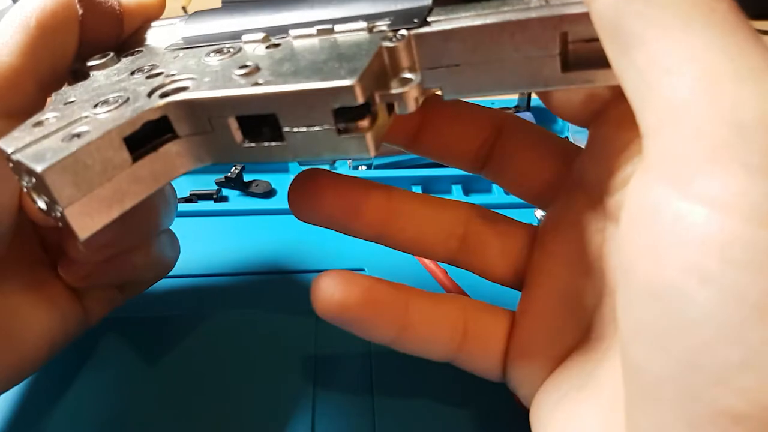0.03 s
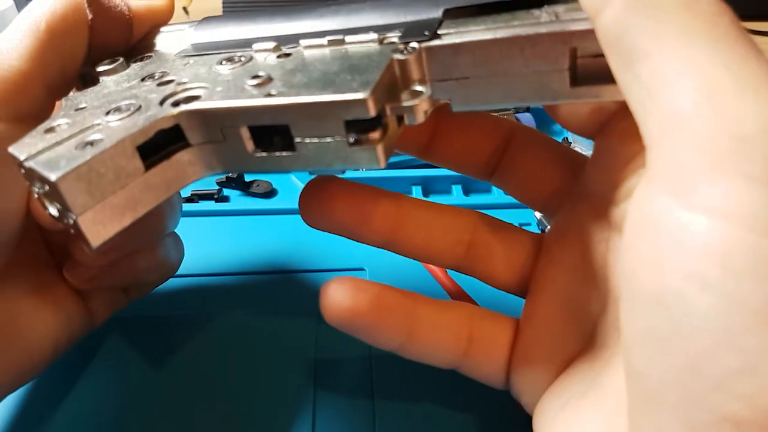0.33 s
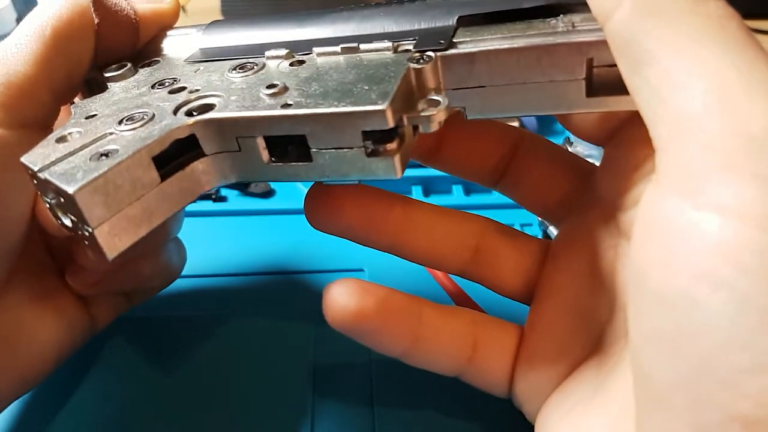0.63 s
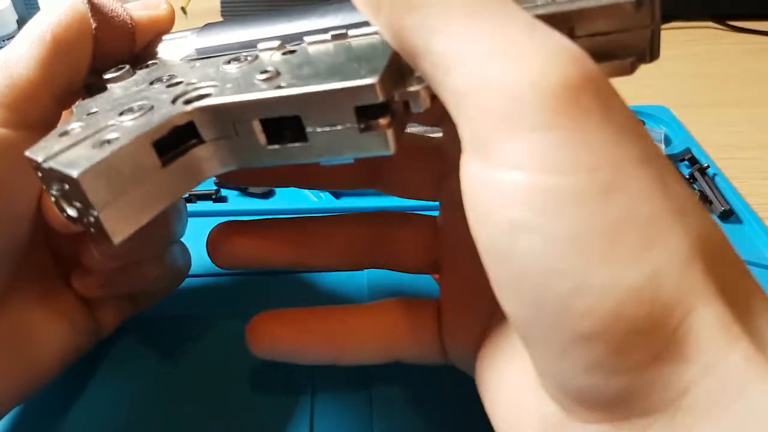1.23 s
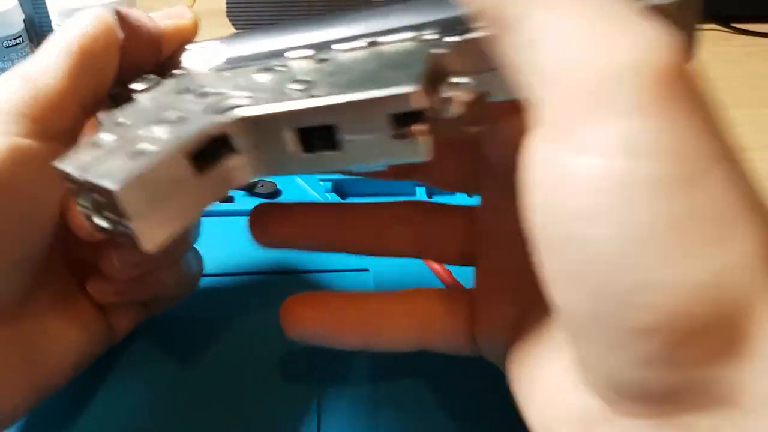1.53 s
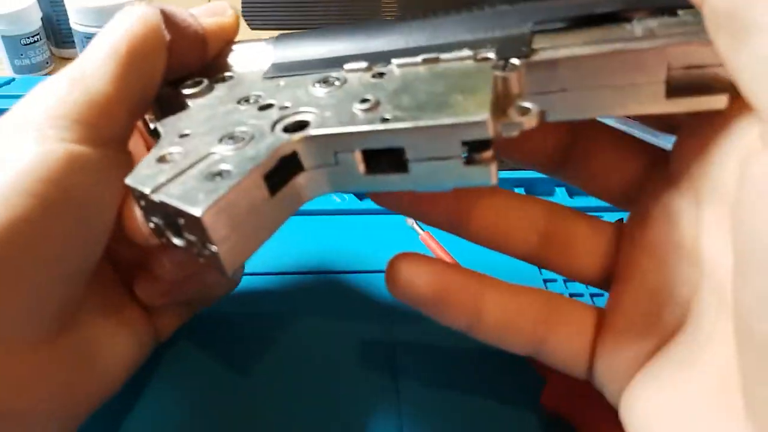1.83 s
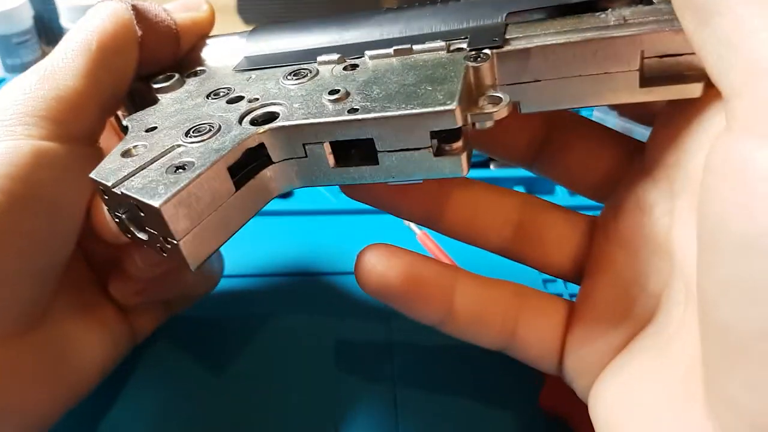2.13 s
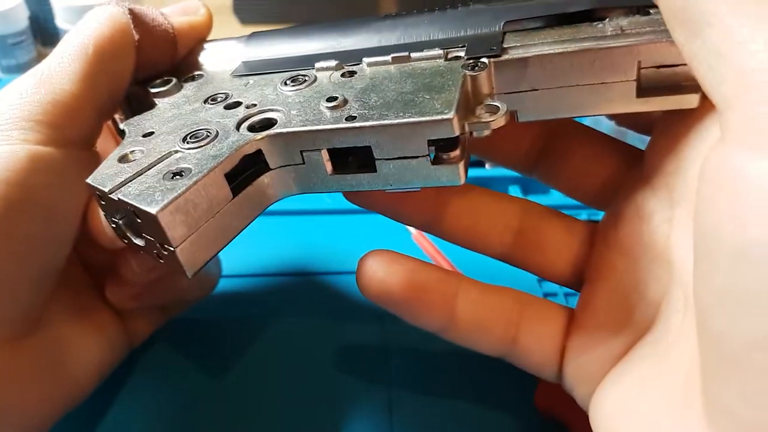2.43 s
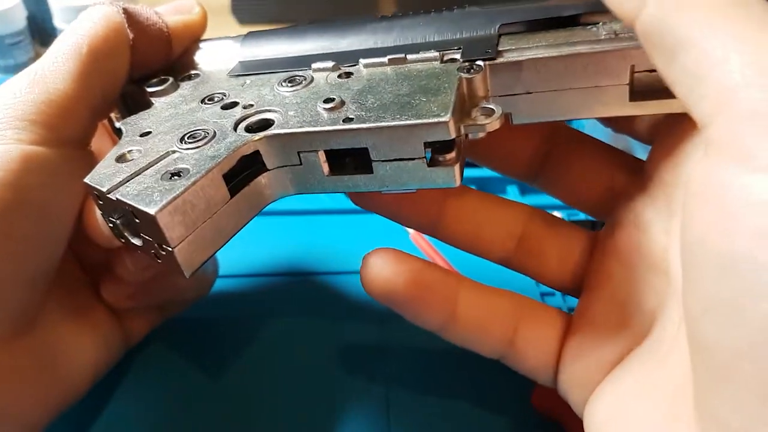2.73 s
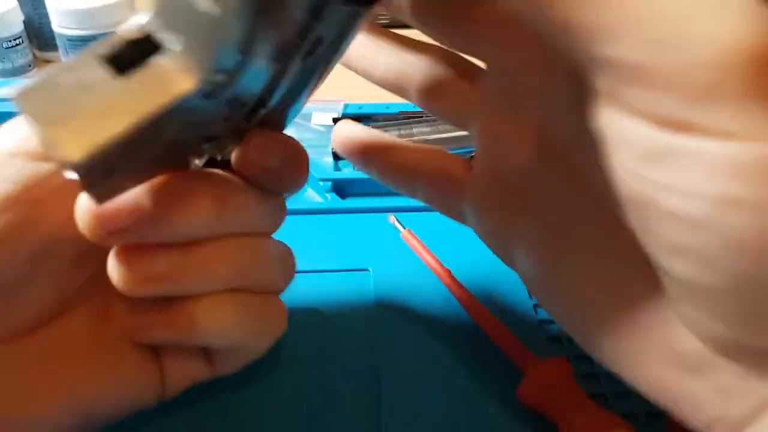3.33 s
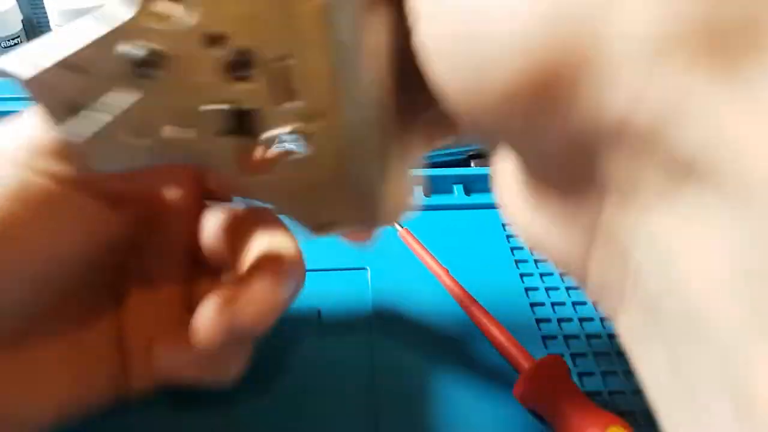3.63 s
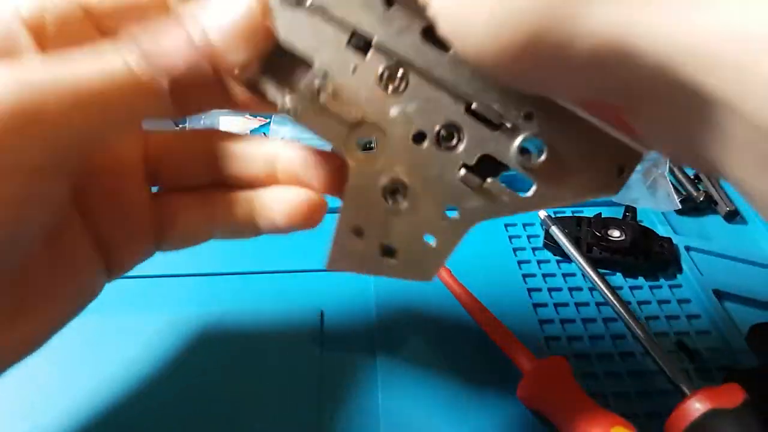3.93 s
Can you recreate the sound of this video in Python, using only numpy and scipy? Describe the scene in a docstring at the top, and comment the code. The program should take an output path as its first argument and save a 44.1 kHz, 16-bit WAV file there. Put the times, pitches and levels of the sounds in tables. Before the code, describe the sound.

A small metal gearbox is spun twice by hand, its gears whirring and clicking fast before coasting down each time. A brief metal scrape and dry clacks follow, heard up close over a faint room hum.

```python
"""A small gearbox spun by hand

A cast-metal gearbox is spun twice and coasts down each time. Gear teeth rattle in the ringing case,
a pawl (a sprung catch) snaps over its ratchet, and slack in the gears closes with knocks.
Then the box is turned over with a slide and a few dry clacks. The room hums quietly."""
import sys
import numpy as np
from scipy import signal
from scipy.fft import rfft, irfft
from scipy.io import wavfile

SR = 44100
rng = np.random.default_rng(int(sys.argv[2]) if len(sys.argv) > 2 else 0)


def to_wav(s):
    """Save 16-bit WAV."""
    ch = np.atleast_2d(s).T  # columns
    pcm = np.round(np.clip(ch, -1, 1) * 32767)  # PCM
    wavfile.write(sys.argv[1], SR, pcm.astype(np.int16))


N = 176400
T = np.arange(N) / SR
RING_SAMPLES = 4096
DAMPED_T60_S = 0.01017  # a "t60" is the time a sound takes to fade by 60 dB


def from_db(db):
    """Turn decibels into a number to multiply by."""
    return 10 ** (np.asarray(db) / 20)


def unit_energy(x):
    """Scale a sound so that its channels have an average energy of one."""
    return x / np.sqrt(np.mean(np.sum(x ** 2, axis=-1)) + 1e-20)


def over_time(points, seconds):
    """Read a table of times and values, drawing straight lines between its rows."""
    return np.interp(seconds, *np.transpose(points))


def over_frequency(points, size):
    """Read a table of frequencies and values at each frequency of a spectrum."""
    hz, value = np.transpose(points)
    spectrum_hz = np.arange(size // 2 + 1) * SR / size
    return np.interp(np.log(spectrum_hz + 1), np.log(hz), value)


def coloured(x, colour):
    """Make some frequencies louder and others softer, following a table."""
    size = x.shape[-1]
    cepstrum = irfft(np.log(from_db(over_frequency(colour, size))), size)
    # Folding onto the first half makes the filter ring after a hit, not before it.
    cepstrum[1:size // 2] *= 2
    cepstrum[size // 2:] = 0
    return irfft(rfft(x) * np.exp(rfft(cepstrum)), size)


def resonance(x, hz, width_hz):
    """Keep a narrow band of the sound around one pitch."""
    r = np.exp(-np.pi * width_hz / SR)
    feedback = [1, -2 * r * np.cos(2 * np.pi * hz / SR), r * r]
    return signal.lfilter(np.array([1, 0, -1]) * (1 - r * r) / 2, feedback, x)


def dulled(x, cutoff_hz, order=1):
    """Turn down the treble above the cutoff."""
    return signal.lfilter(*signal.butter(order, cutoff_hz, fs=SR), x)


def dying_noise(t60, size=RING_SAMPLES):
    """A burst of stereo noise that fades away."""
    return unit_energy(rng.standard_normal((2, size)) * from_db(-60 * T[:size] / t60))


def add(out, start_s, sound):
    """Mix a sound in at the given time."""
    i = int(np.clip(start_s * SR, 0, N - 1))
    out[..., i:i + sound.shape[-1]] += sound[..., :N - i]


def room_noise():
    """A soft, steady rush whose low notes are nearly the same in both ears."""
    # Each row: frequency in Hz, relative level in dB.
    noise_colour = [(20, 2), (45, -11), (72, -1.5), (98, -8.5), (130, -3.5), (190, -4), (300, -7.5),
                    (450, -11.5), (700, -17.5), (1200, -22.5), (2000, -21.5), (4000, -30), (8000, -37),
                    (16000, -32)]
    # Each row: frequency in Hz, how alike left and right are from 0 to 1.
    ear_likeness = [(50, .99), (130, 0.93), (300, 0.84), (800, 0.31), (2000, 0)]
    common, side = rfft(rng.standard_normal((2, N)))
    alike = over_frequency(ear_likeness, N)
    spectrum = np.sqrt(1 + alike) * common + np.sqrt(1 - alike) * side * [[1], [-1]]
    air = irfft(from_db(over_frequency(noise_colour, N)) * spectrum, N)
    return from_db(-50) * np.sqrt(N) * unit_energy(air)


def room_hum():
    """Three low, steady tones hum in the room."""
    # Each row: pitch in Hz, average level in dB.
    hum_tones = [(74.5, -61), (123, -63), (190, -62)]
    return sum(np.sqrt(2) * from_db(db) * np.sin(2 * np.pi * (hz * T + rng.random()))
               for hz, db in hum_tones)


def contact(bounce_s, bounce_db, bounces=24):
    """The force of one touch, then tiny rebounds that die down over twice bounce_s."""
    force = np.zeros(RING_SAMPLES)
    delays = (np.arange(bounces) + rng.uniform(.3, 1, bounces)) / bounces * 2
    sizes = unit_energy(rng.standard_normal(bounces) * np.exp(-delays))
    np.add.at(force, (delays * bounce_s * SR).astype(int) + 1, from_db(bounce_db) * sizes)
    force[0] = 1
    return unit_energy(force)


def case_ring():
    """The metal case, hit at one spot, gives a brief crack and rings at its own pitches."""
    # Each row: pitch in Hz, left and right relative levels in dB, t60 in seconds,
    # how far the right ear's wave is ahead in radians.
    case_tones = [(642.2, -20, -16, 0.0327, .5), (770.4, -17.5, -19, 0.01665, 0),
                  (988.2, -14.5, -15, 0.0435, -1.25), (1325.4, -16, -14.5, 0.0193, -1.5),
                  (1701.5, -46, -7, 0.048, 2.5), (1785.5, -15.5, -4.5, 0.088, -2),
                  (1884.2, -8, -15, 0.0476, 0), (1961, -10, -28, 0.0396, -1.5),
                  (2180.4, 0, -4.5, 0.0697, 4), (2966.5, -5, -5.5, 0.0525, 2),
                  (3057.7, -4.5, -4, 0.0167, 1.5), (3281, -6.5, -16, 0.017, 2),
                  (3622.3, -14.5, -7.5, 0.064, 4), (3827, -11.5, -23.5, 0.0283, 3),
                  (4340, -10, -11, 0.0196, -2.5), (4675, -33.5, -14, 0.0254, -5),
                  (4985, -10, -38, 0.0155, -1.92), (5581, -6.5, -7, 0.005, 4.5),
                  (5612.5, -10.5, -6.5, 0.0236, 4), (6084, -12, -21, 0.045, 1),
                  (8129, -15.5, -34, 0.038, 13), (9234, -20, -14, 0.012, -2.5),
                  (11803, -26, -12, 0.0303, -3.5), (13710, -14, -12, 0.0081, 2.5)]
    # Each row: frequency in Hz, boost or cut in dB.
    crack_colour = [(200, -4), (600, -6.5), (1200, -10), (2000, 8), (3500, -0.5), (6000, -4.5), (7500, -5),
                    (9500, -9.5), (15500, -4)]
    t, ring = T[:RING_SAMPLES], 0
    for hz, left_db, right_db, t60, lead in case_tones:
        phase = 2 * np.pi * (hz * t + rng.random()) + lead * np.array([[0], [1]])
        tone = unit_energy(np.sin(phase) * from_db(-60 * t / t60))
        ring = ring + from_db([[left_db], [right_db]]) * tone
    crack = unit_energy(coloured(dying_noise(t60=0.0186), crack_colour))
    return unit_energy(ring) + from_db(-3.5) * crack


def struck(ring, bounce_s, bounce_db):
    """One bouncing touch sets off a ring."""
    force = contact(bounce_s, bounce_db)
    return signal.fftconvolve(ring, force[None], axes=1)[:, :RING_SAMPLES]


def tooth_hits(times, levels_db, spots=6):
    """Each meeting of teeth shakes one of several spots on the case, picked at random."""
    # Each row: frequency in Hz, boost or cut in dB.
    tooth_colour = [(200, -1), (650, 3), (1000, 1.5), (2100, 1.5), (3000, 0), (4300, 2.5), (6000, -7),
                    (9000, -4), (15500, -6.5)]
    forces = np.zeros((spots, N))
    for spot, start, db in zip(rng.integers(0, spots, len(times)), times, levels_db):
        add(forces[spot], start, from_db(db) * contact(bounce_s=.003, bounce_db=0))
    return sum(signal.oaconvolve(force[None], coloured(case_ring(), tooth_colour), axes=1)[:, :N]
               for force in forces)


def gear_rattle():
    """Tooth after tooth meets, unevenly, slower and softer as each spin runs out."""
    # The hand's drive in each spin. Each row: time in seconds, relative level in dB.
    first_spin = [(0.0, -26), (0.03, -32.5), (0.196, -32.5), (0.64, -35.5), (0.772, -39.5), (0.784, -33.5),
                  (1.022, -40), (1.158, -40), (1.204, -47), (1.222, -30.5), (1.242, -54), (1.36, -78.5)]
    second_spin = [(1.5, -56.5), (1.55, -38.5), (1.566, -42.5), (1.596, -35.5), (1.624, -33), (2.298, -38),
                   (2.36, -41), (2.388, -41.5), (2.598, -44), (2.698, -59), (2.724, -54), (2.74, -47.5),
                   (2.802, -47.5), (3.0, -70)]
    # Each row: time in seconds, teeth meeting per second.
    gear_speed = [(0, 259.7), (.7, 193.3), (1.25, 124.3), (1.5, 130.5), (1.62, 250), (2.2, 170), (2.95, 89)]
    # The teeth keep up a ring near 3 kHz. Each row: time in seconds, gain of that added ring in dB.
    wheel_ring = [(0, -17), (.1, -8.5), (.35, -6), (.68, -2), (1.1, -7), (1.58, -15), (1.8, -1.5),
                  (2.3, 1.5), (2.9, -1)]
    jitter, spread_db, fast_teeth_per_s = .22, 2.0, 173.3
    rate = over_time(gear_speed, T)
    even_times = T[1:][np.diff(np.floor(np.cumsum(rate) / SR)) > 0]
    time_chance, level_chance = rng.standard_normal((len(even_times), 2)).T
    gap_s = 1 / over_time(gear_speed, even_times)
    times = even_times + jitter * gap_s * time_chance
    db = over_time([*first_spin, *second_spin], times) + spread_db * level_chance
    db += 10 * np.log10(gap_s * SR)  # so the drive sets the loudness, however far apart the hits are
    turning = (times < first_spin[-1][0]) | ((times > second_spin[0][0]) & (times < second_spin[-1][0]))
    rattle = from_db(-2) * tooth_hits(times[turning], db[turning])
    rattle += from_db(over_time(wheel_ring, T)) * resonance(rattle, hz=3002, width_hz=133.6)
    # Slow teeth meet softly and lose their treble.
    soft = dulled(rattle, cutoff_hz=4860)
    return soft + (rattle - soft) * (rate / fast_teeth_per_s) ** 1.04


def pawl_snaps(spots=8):
    """The pawl drops off each ratchet tooth with a bright, buzzing snap on the case."""
    # Each row: start in seconds, relative level in dB.
    pawl_drops = [(0.014, -30.5), (0.0291, -14), (0.0603, -24.5), (0.0823, -20.5), (0.0915, -21),
                  (0.1113, -20.5), (0.1238, -27), (0.1499, -18.5), (0.1767, -23.5), (0.2388, -23.5),
                  (0.2789, -18.5), (0.3061, -18.5), (0.3188, -20.5), (0.341, -25.5), (0.3775, -25),
                  (0.4199, -20), (0.435, -27), (0.4606, -18.5), (0.4714, -22.5), (0.5025, -19.5),
                  (0.535, -25), (0.5546, -31), (0.5891, -21), (0.5974, -20.5), (0.632, -27),
                  (0.6458, -33.5), (0.6848, -35), (0.6967, -26), (0.7454, -26), (0.7977, -21), (0.813, -40),
                  (0.8712, -28), (0.9449, -30.5), (1.0228, -29), (1.073, -34), (1.0974, -34),
                  (1.1117, -31.5), (1.1277, -29.5), (1.1497, -34.5), (1.2177, -48.5), (1.2302, -33.5),
                  (1.564, -23.5), (1.6053, -17.5), (1.6356, -19), (1.6464, -20), (1.6785, -25),
                  (1.7115, -19.5), (1.7215, -22.5), (1.7574, -28.5), (1.7968, -18.5), (1.8361, -21.5),
                  (1.881, -27), (1.921, -23), (1.9719, -20.5), (1.985, -42.5), (2.0228, -19.5),
                  (2.0831, -26.5), (2.091, -32.5), (2.1385, -30), (2.151, -25), (2.2044, -28.5),
                  (2.2151, -26.5), (2.2834, -24), (2.368, -28.5), (2.3868, -30), (2.4299, -30.5),
                  (2.4639, -35), (2.577, -33.5), (2.599, -37.5)]
    # Each row: frequency in Hz, boost or cut in dB.
    snap_colour = [(200, -7.5), (1000, -1.5), (2000, 5), (3000, -8.5), (4300, 10.5), (6000, 8), (9000, 4.5),
                   (15500, 2)]
    out = np.zeros((2, N))
    rings = [coloured(case_ring(), snap_colour) for _ in range(spots)]
    for k, (start, db) in enumerate(pawl_drops):
        snap = struck(rings[k % spots], bounce_s=.008, bounce_db=5)
        add(out, start, from_db(db + 19.5) * unit_energy(snap))
    return out


def slack_knocks(spots=8):
    """Slack in the gears closes with a knock that brings out the case's tones near one pitch."""
    # Each row: start in seconds, relative level in dB, boosted pitch in Hz.
    knock_hits = [(0.0308, -28.5, 2140), (0.0724, -22, 3005), (0.0914, -22.5, 2186), (0.1087, -22.5, 2200),
                  (0.1516, -28, 2206), (0.4662, -25, 2246), (0.5891, -20.5, 2047), (0.6331, -26, 3040),
                  (0.6448, -24.5, 3130), (0.7914, -20.5, 2118), (0.7975, -29, 1920), (0.8414, -32, 2230),
                  (0.9213, -26, 3110), (1.036, -34.5, 2230), (1.0604, -29.5, 3070), (1.1082, -26.5, 1730),
                  (1.1501, -29.5, 1790), (1.2177, -25, 1746), (1.4516, -31.5, 3233), (1.4559, -31, 3125),
                  (1.509, -36.5, 1940), (1.5328, -28, 2080), (1.5424, -22.5, 2150), (1.5834, -19, 1920),
                  (1.5894, -15.5, 2117), (1.5974, -20.5, 1770), (1.6084, -34, 2170), (1.7984, -26, 2880),
                  (1.8314, -22, 2180), (1.8995, -26, 3042), (1.9729, -23.5, 2013), (2.0228, -27.5, 2150),
                  (2.0522, -36, 2950), (2.1203, -41.5, 1780), (2.1904, -24.5, 2937), (2.2597, -26.5, 2965),
                  (2.2875, -26, 2964), (2.4038, -27, 3015), (2.4193, -33.5, 3020), (2.4399, -23.5, 2940),
                  (2.5057, -26, 2990), (2.5294, -28, 3030), (2.598, -29.5, 1727), (2.7062, -40, 2957),
                  (2.7194, -36, 3032), (2.7872, -30.5, 1920), (2.7964, -28, 3000), (2.8024, -35.5, 3040),
                  (2.827, -31, 3035), (2.8489, -34, 2930), (2.9007, -36, 3100), (2.9389, -39, 1976),
                  (3.4236, -40.5, 2930)]
    # Each row: frequency in Hz, boost or cut in dB.
    knock_colour = [(200, -4.5), (1000, -7.5), (2000, 7.5), (3000, 3), (4300, 10.5), (6000, -3), (9000, 6),
                    (15500, -19.5)]
    out = np.zeros((2, N))
    rings = [coloured(case_ring(), knock_colour) for _ in range(spots)]
    for k, (start, db, hz) in enumerate(knock_hits):
        knock = struck(rings[k % spots], bounce_s=.003, bounce_db=5)
        knock += from_db(11) * resonance(knock, hz, width_hz=249)
        add(out, start, from_db(db + 21.5) * unit_energy(knock))
    return out


def sinking_tones():
    """A faint low tone sinks in pitch, three times."""
    # Each row: start in seconds, peak level in dB.
    tone_starts = [(0.541, -47), (1.8, -51), (3.06, -58)]
    from_hz, toward_hz, sink_s, length_s = 125.3, 26.1, 0.053, 0.272
    t = T[T < length_s]
    pitch = toward_hz + (from_hz - toward_hz) * np.exp(-t / sink_s)
    swell = np.sqrt(np.sin(np.pi * t / length_s))
    tone = swell * np.sin(2 * np.pi * np.cumsum(pitch) / SR)
    out = np.zeros(N)
    for start, db in tone_starts:
        add(out, start, from_db(db) * tone)
    return out


def dry_clacks():
    """Loose parts clack, and the hand stops them from ringing on."""
    # Each row: start in seconds, relative level in dB, treble cutoff in Hz, boosted pitch in Hz.
    clack_hits = [(1.452, -40, 6100, 3360), (2.787, -35, 14000, 4870), (2.849, -41.5, 11810, 3082),
                  (3.068, -43, 8000, 4130), (3.424, -45.5, 4500, 3360), (3.503, -28.5, 14000, 2210),
                  (3.524, -35, 3500, 1710), (3.578, -31.5, 4000, 1920), (3.583, -21.5, 3260, 1620),
                  (3.593, -36, 5000, 2100), (3.659, -38.5, 3600, 2000), (3.680, -42, 4500, 3000),
                  (3.696, -37, 4000, 2040), (3.704, -37, 6000, 3600), (3.773, -45, 3960, 1700),
                  (3.786, -42.5, 2400, 900), (3.951, -35, 3500, 749.2), (3.958, -40.5, 5040, 2350)]
    # Each row: frequency in Hz, boost or cut in dB.
    clack_colour = [(200, -31.5), (480, -1), (780, 8.5), (1120, 1), (1600, 11.5), (2200, 8.5), (2900, 4.5),
                    (3800, 9), (5000, 1), (7000, 6.5), (9500, -10), (15500, 3)]
    out = np.zeros((2, N))
    for start, db, cutoff_hz, hz in clack_hits:
        burst = coloured(dying_noise(DAMPED_T60_S), clack_colour)
        clack = struck(burst, bounce_s=.002, bounce_db=4)
        clack += from_db(4) * resonance(clack, hz, width_hz=575)
        clack = dulled(clack, cutoff_hz, order=2)
        add(out, start, from_db(db + 22.5) * unit_energy(clack))
    return out


def metal_slides(grains_per_s=4000):
    """Metal rubs on metal as the box is turned: tiny grains of friction swell and fade."""
    # Each row: time of the peak in seconds, relative level in dB, rise and fall times in seconds.
    slide_swells = [(3.412, -48.5, 0.0148, 0.0204), (3.51, -48, 0.0058, 0.0207),
                    (3.589, -36, 0.00865, 0.0211), (3.68, -54.5, 0.025, 0.0754)]
    # Each row: frequency in Hz, boost or cut in dB.
    slide_colour = [(200, -15), (900, -3), (2000, 10), (3800, 8.5), (6000, 4), (8000, 1.5), (10000, -5),
                    (15500, -1.5)]
    swell = sum(from_db(db) * np.exp(-np.maximum((peak - T) / rise, (T - peak) / fall))
                for peak, db, rise, fall in slide_swells)
    catches = rng.random(N) < grains_per_s / SR
    grains = catches * rng.standard_normal(N) * np.sqrt(SR / grains_per_s)
    scrape = signal.oaconvolve((swell * grains)[None], dying_noise(DAMPED_T60_S), axes=1)[:, :N]
    return coloured(scrape, slide_colour)


def room_echo(x):
    """The small room adds a short, dull tail to a sound."""
    tail = dulled(dying_noise(t60=0.25, size=20000), cutoff_hz=6350)
    return from_db(-7) * signal.oaconvolve(x, tail, axes=1)[:, :N]


def scene():
    """The gearbox heard up close, in its quiet room."""
    background = room_noise() + room_hum() + sinking_tones()
    box = pawl_snaps() + slack_knocks() + dry_clacks() + metal_slides() + gear_rattle()
    return box + room_echo(box) + background


def record(dry):
    """Cut off the very highest treble steeply."""
    cutoff_hz = 15850
    return signal.sosfilt(signal.ellip(12, .2, 70, cutoff_hz, fs=SR, output="sos"), dry)


dry = scene()
out = record(dry)
to_wav(out)
```